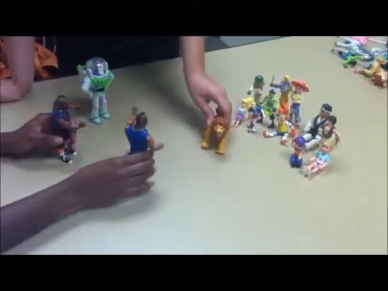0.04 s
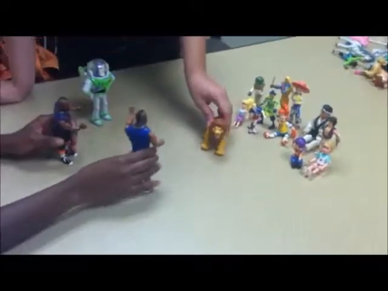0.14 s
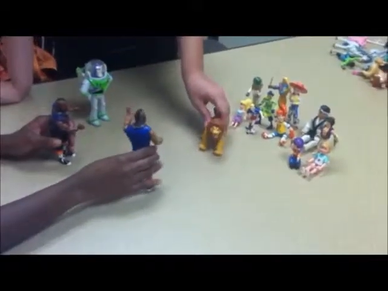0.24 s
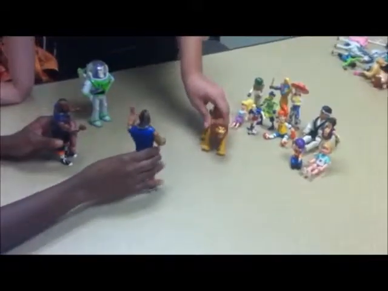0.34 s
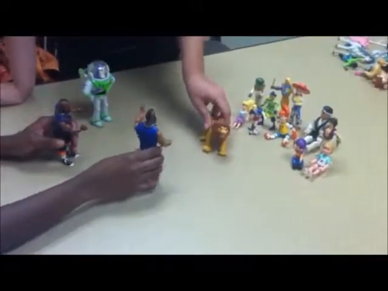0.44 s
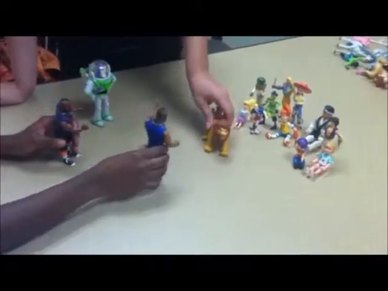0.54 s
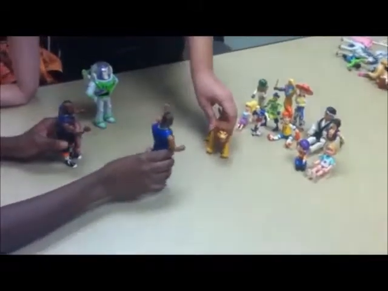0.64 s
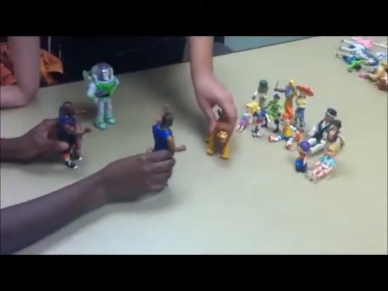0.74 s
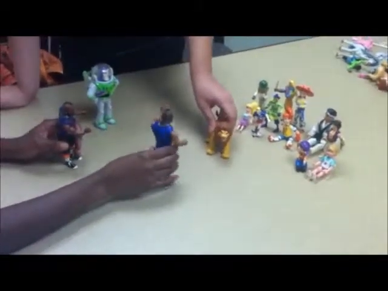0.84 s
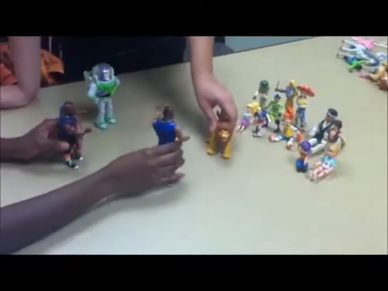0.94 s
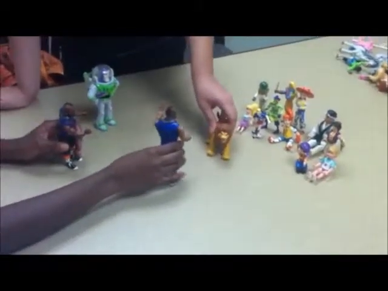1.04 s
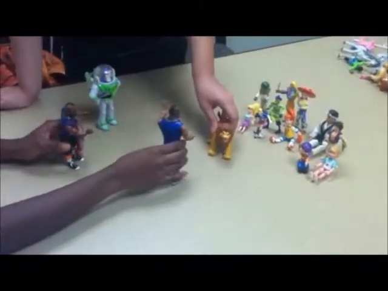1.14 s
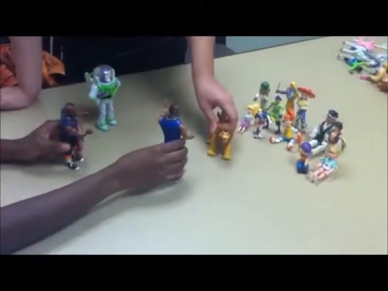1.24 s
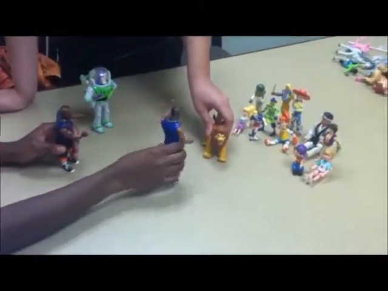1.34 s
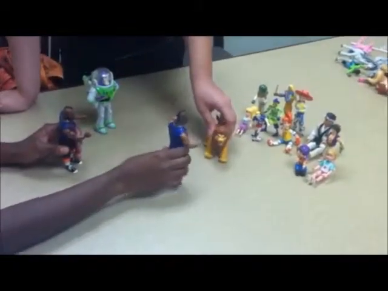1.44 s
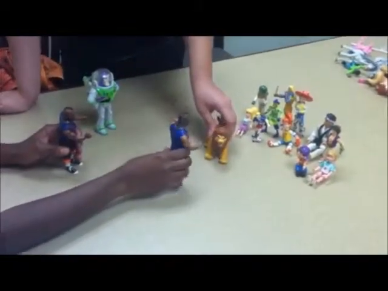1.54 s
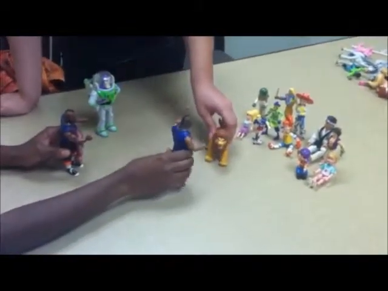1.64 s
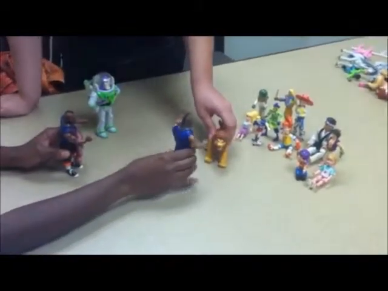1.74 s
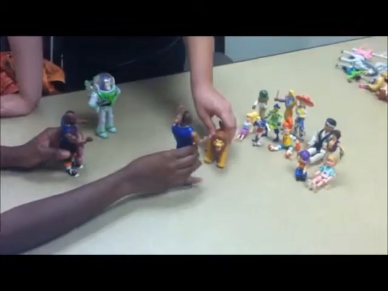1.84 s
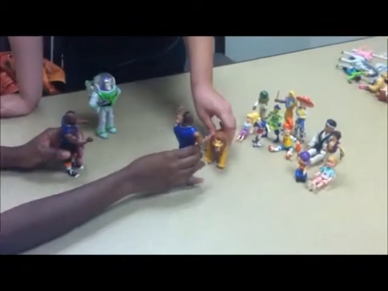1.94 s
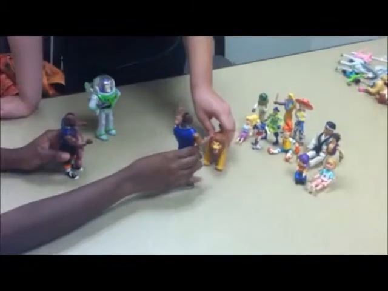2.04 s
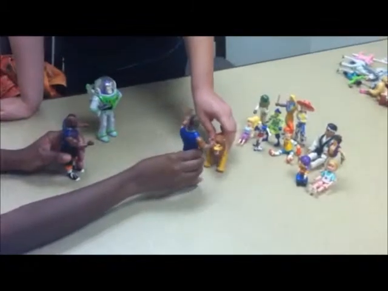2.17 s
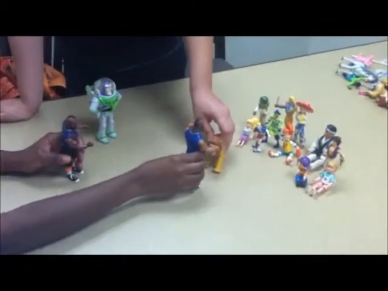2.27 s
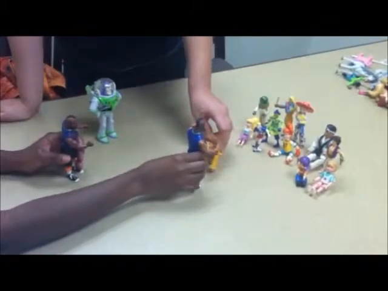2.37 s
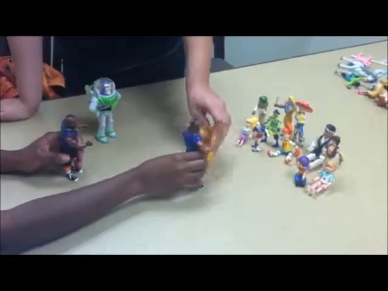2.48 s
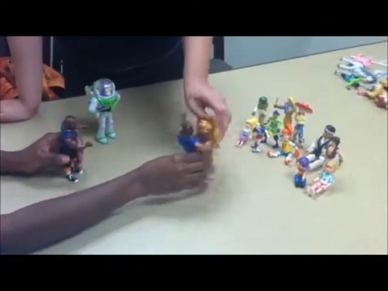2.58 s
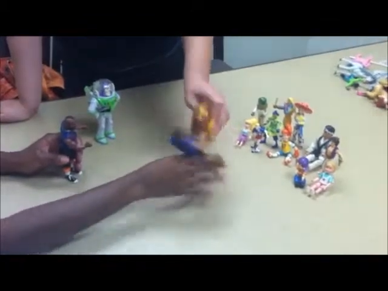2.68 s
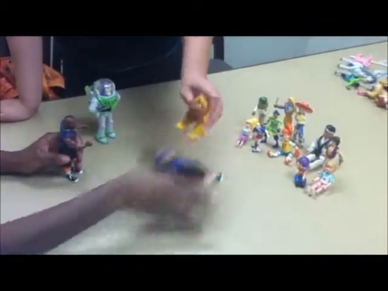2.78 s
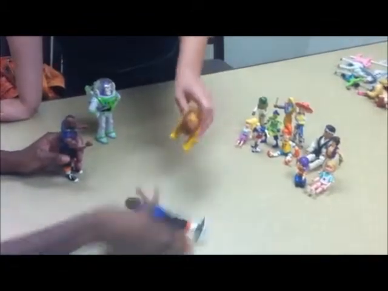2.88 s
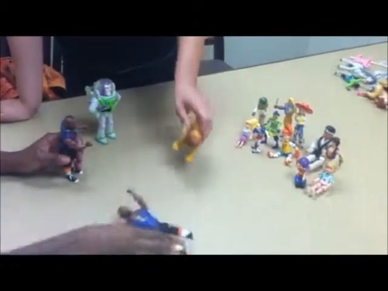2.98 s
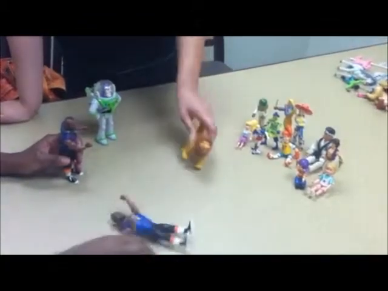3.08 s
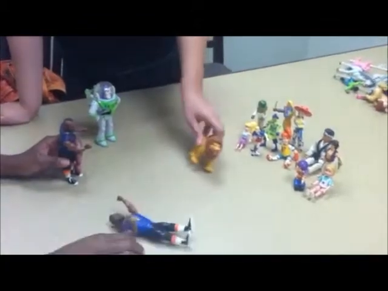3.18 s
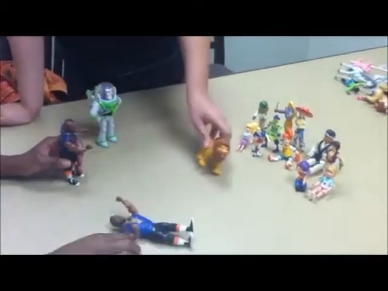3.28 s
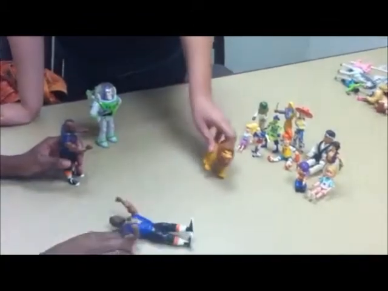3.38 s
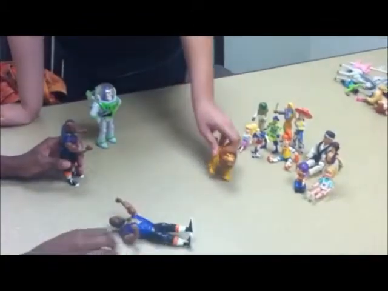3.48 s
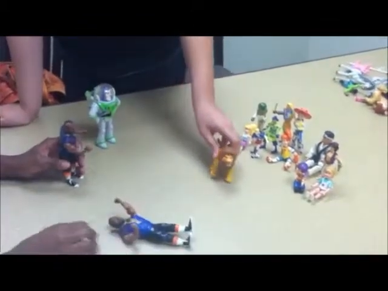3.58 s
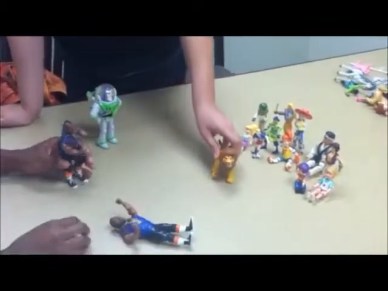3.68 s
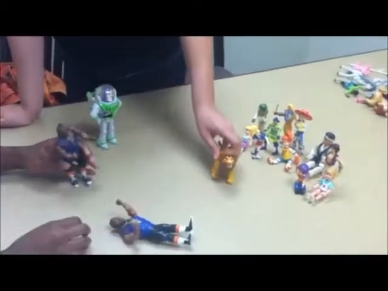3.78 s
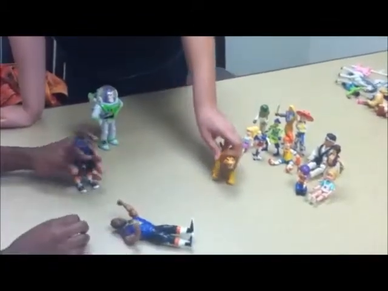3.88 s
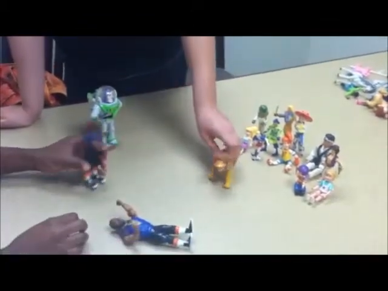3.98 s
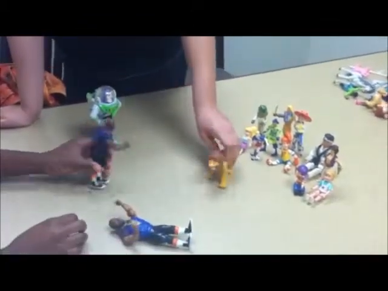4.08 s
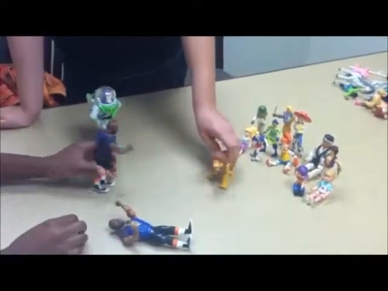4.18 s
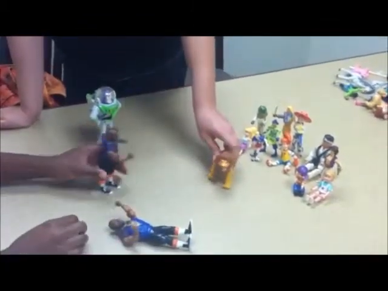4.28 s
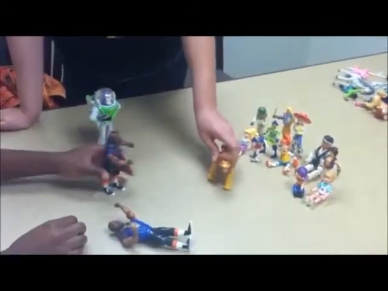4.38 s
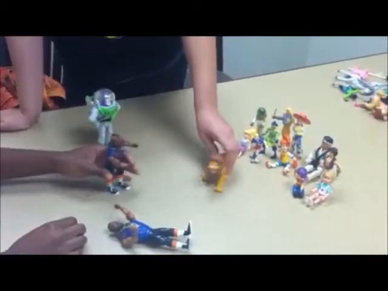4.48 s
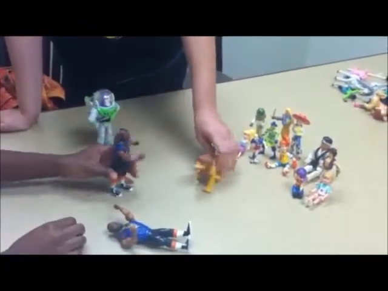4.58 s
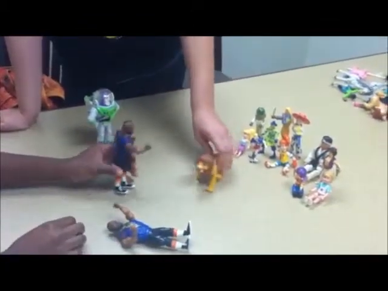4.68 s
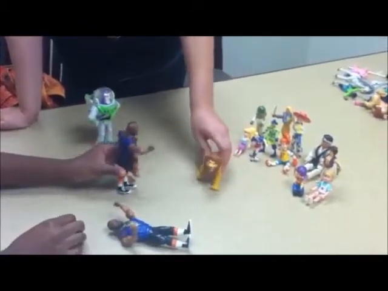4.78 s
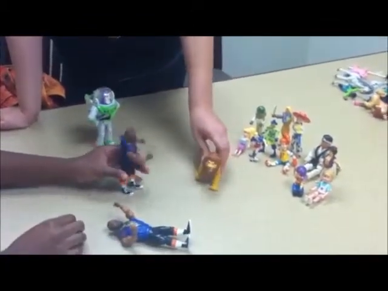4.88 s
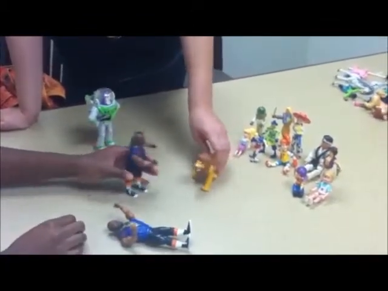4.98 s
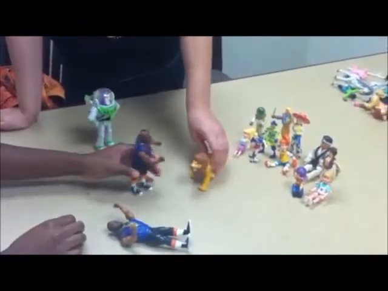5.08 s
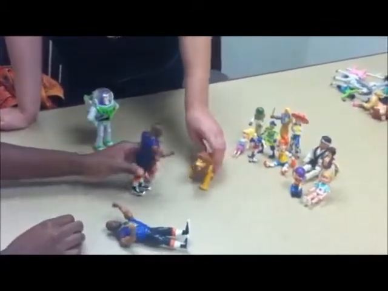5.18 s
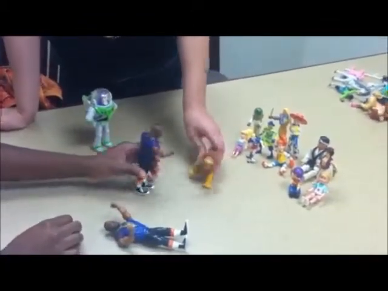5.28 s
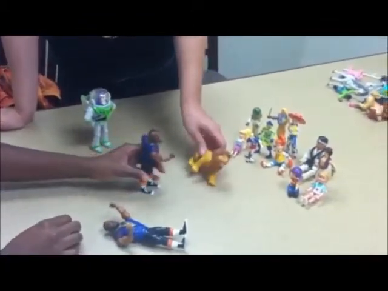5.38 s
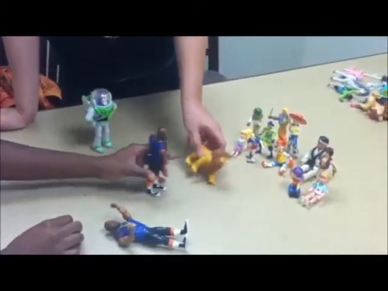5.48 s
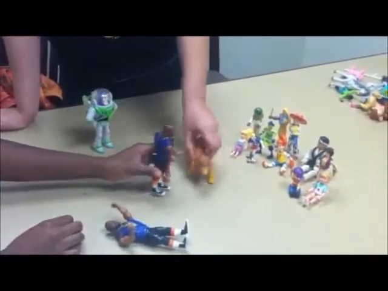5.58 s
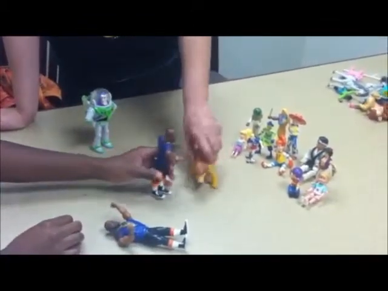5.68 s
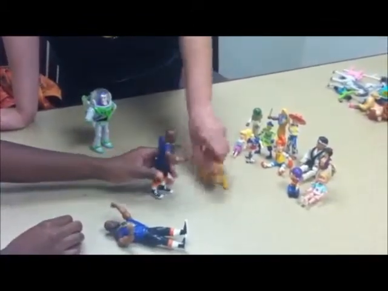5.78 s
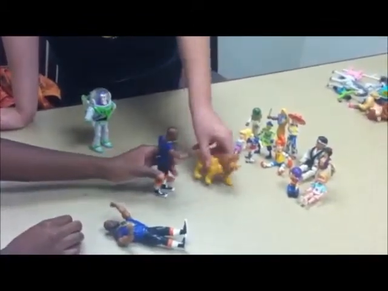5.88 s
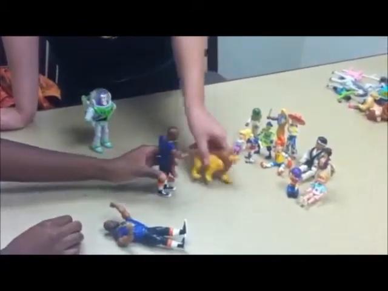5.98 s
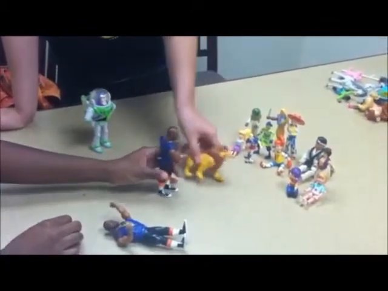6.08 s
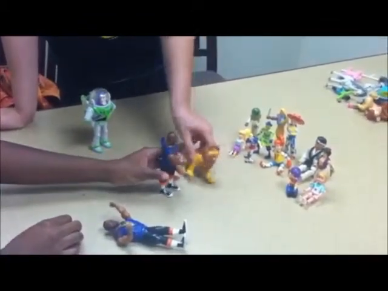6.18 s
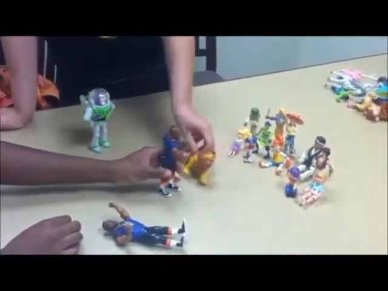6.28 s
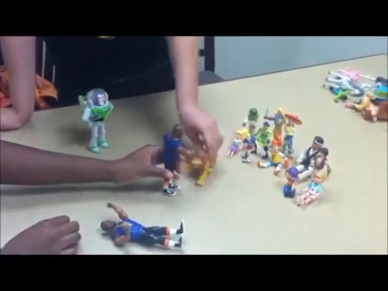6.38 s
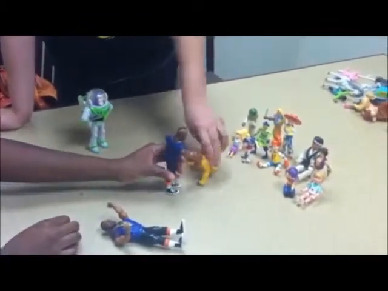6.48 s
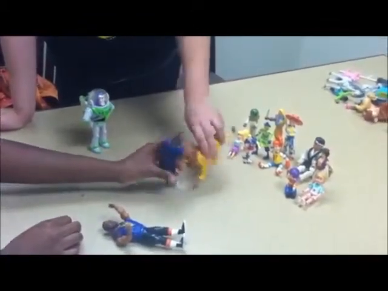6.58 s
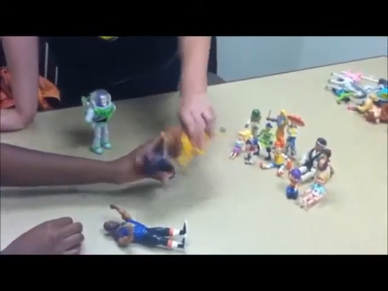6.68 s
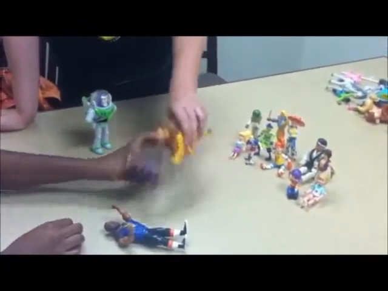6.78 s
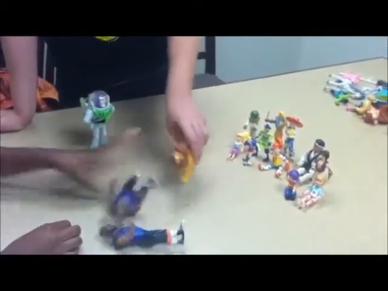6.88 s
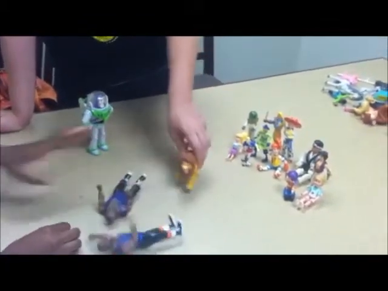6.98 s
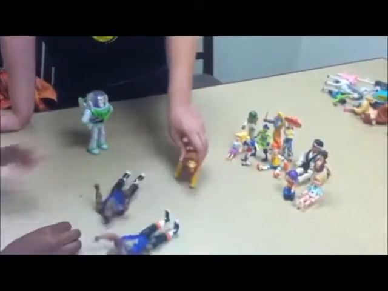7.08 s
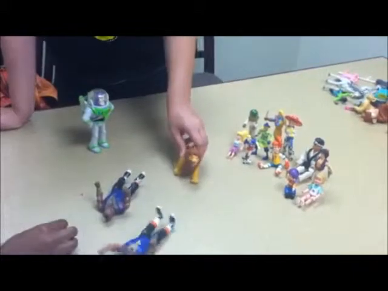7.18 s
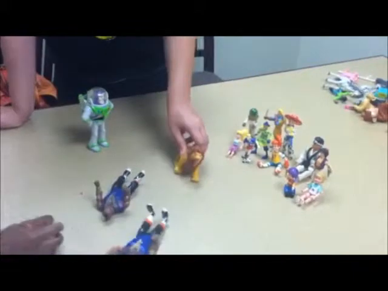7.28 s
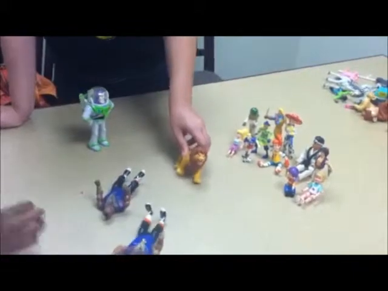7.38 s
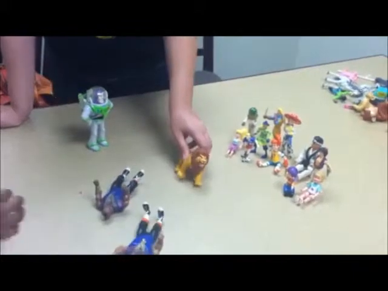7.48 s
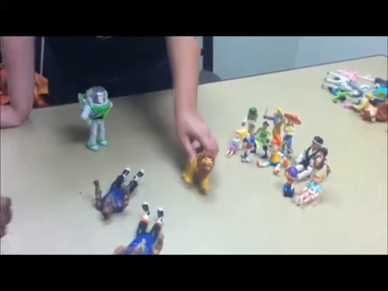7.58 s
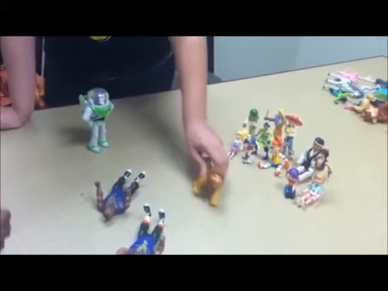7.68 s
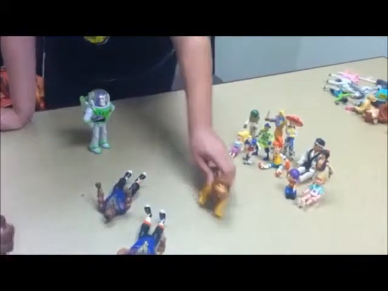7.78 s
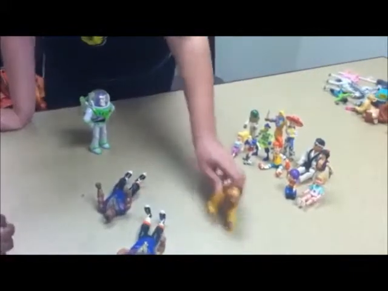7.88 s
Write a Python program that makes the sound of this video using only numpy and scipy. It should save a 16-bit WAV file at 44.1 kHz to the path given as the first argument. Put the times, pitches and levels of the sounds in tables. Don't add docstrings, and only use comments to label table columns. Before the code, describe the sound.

Faint toy footsteps on a wooden table, a hard plastic knock and clatter, more scuffing taps, then a second rattling fall and a final knock.

```python
import sys
import numpy as np
from scipy import signal
from scipy.io import wavfile

SR = 44100
rng = np.random.default_rng(int(sys.argv[2]) if len(sys.argv) > 2 else 0)


def field_ratio(decibels):
    return 10 ** (np.asarray(decibels, dtype=float) / 20)


def to_wav(sig):
    pcm = np.clip(np.atleast_2d(sig), -1, 1) * 32767
    pcm = np.round(pcm).astype(np.int16)
    wavfile.write(sys.argv[1], SR, pcm.T)


N = 349713

# f/Hz, density/dB per Hz
HUSH_SPECTRUM = [(15, -30), (25, -5), (36, -4.5), (54, -19), (241, 0.5), (811, -21.5), (901, -9),
                 (1240, -13), (2150, -15), (4150, -16), (5130, -16.5), (7820, -19.5), (12600, -29),
                 (13600, -21)]
# t/s, rms level/dB
WHINE_LEVEL = [(0, -89), (.6, -100), (1.3, -91), (1.5, -86), (3.3, -89.5), (3.8, -103), (6.6, -99),
               (7.0, -86), (7.93, -85.5)]
# f/Hz, level re direct/dB, t60/s
ROOM_TAIL = [(99, -15, 0.33), (243, 0.5, 0.5), (497, -6.5, 0.51), (1053, 0, 0.47), (1700, -3.5, 0.45),
             (2600, -6, 0.45), (4150, -9, 0.56), (6700, -8, 0.23), (12050, -7.5, 0.61)]
# t/s, length/s, rumble level/dB, rasp re rumble/dB, grit re rasp/dB
SCUFFS = [(-0.02, 0.14, -61.5, -7.5, -1), (0.32, 0.33, -69.5, -9, -2), (1.11, 0.52, -67.5, -10, -6),
          (2.554, 0.15, -70, 21, 8.5), (2.764, 0.15, -73, 10, 4), (2.905, 0.025, -54, -17, -3),
          (3.29, 0.057, -77.5, 8.5, 16), (7.183, 0.19, -76, 12.5, 10.5), (3.411, 0.12, -65.5, 1.5, 2),
          (3.519, 0.63, -69.5, -1.5, 6), (3.998, 0.11, -59.5, -4.5, -1), (4.36, 0.13, -60.5, -9, 6),
          (4.486, 0.66, -60, -8.5, -3), (5.262, 0.15, -67, -6.5, -2), (5.389, 0.034, -66.5, 14.5, -8),
          (5.406, 0.047, -66.5, 14.5, -1.5), (5.491, 0.12, -62, -1.5, -1), (5.724, 0.43, -64, 0.5, -0.5),
          (6.127, 0.15, -60, -6, -5.5), (6.267, .09, -72, 10, -3), (6.395, 0.16, -70, 10.5, -2),
          (6.614, 0.18, -86, 13.5, 9.5), (7.373, 0.6, -59, -7, 1.5)]
# t/s, peak level/dB, f/Hz, t60/s
TICKS = [(2.563, -23.5, 3000, 0.0014), (2.563, -18.5, 5970, 0.0022), (2.587, -46, 5350, .02),
         (2.608, -37.5, 802, 0.011), (2.608, -36, 4970, .005), (2.643, -40, 7500, .004),
         (2.651, -41, 2470, 0.0076), (2.698, -50, 7200, .004), (2.706, -46, 5500, .005),
         (2.7491, -32, 5560, 0.0058), (2.7479, -41, 2270, 0.013), (2.760, -45, 2400, .006),
         (2.861, -53, 4960, .005), (2.909, -60, 5400, 0.0077), (2.940, -55, 3520, .004),
         (2.962, -69, 4500, .004), (2.987, -26, 1400, 0.0031), (3.130, -48, 9400, .004),
         (3.228, -52, 7000, 0.0045), (3.308, -56, 7500, 0.0038), (3.332, -54, 9450, .004),
         (3.346, -55.5, 6500, .004), (5.340, -57.5, 5470, 0.0054), (5.411, -54, 4000, .004),
         (5.421, -49, 7960, 0.0055), (5.421, -47, 1890, .01), (5.462, -57, 1800, 0.029),
         (6.255, -45.5, 1575, 0.021), (6.262, -43.5, 2170, .015), (6.266, -57, 2780, 0.013),
         (6.678, -49, 7500, .005), (6.740, -30.5, 5500, .005), (6.786, -34, 5250, .005),
         (6.921, -30, 3080, 0.0029), (6.963, -38, 1500, 0.0058), (6.993, -29, 1190, 0.0046),
         (6.9985, -22, 1800, .0015), (7.004, -37, 2400, .006), (7.025, -36, 5800, .005),
         (7.032, -29, 5460, 0.0057), (7.147, -44, 4100, .005), (7.1727, -15.5, 2600, 0.00048),
         (7.176, -41, 2700, .008), (7.274, -41, 6000, .004), (7.300, -56, 8000, .004),
         (7.314, -55, 6970, .004), (7.321, -49, 5530, .004), (7.340, -48, 6500, .004),
         (7.7836, -16, 1500, 0.0012)]
# t/s, peak level/dB, f/Hz, t60/s
TOCKS = [(4.193, -46, 435, 0.044), (3, -55, 435, 0.04), (3.3, -47, 454, 0.087), (5.2, -49, 454, 0.099),
         (7.56, -58, 466, 0.2), (6.925, -34, 600, 0.034), (7.176, -27, 3200, 0.0069),
         (1.572, -55, 2120, 0.0091), (4.503, -55, 2400, .03), (2.985, -23, 260, 0.067),
         (2.9853, -15, 410, .012), (3.015, -35, 600, 0.018), (3.027, -34, 1150, 0.019),
         (0.41, -54, 1400, .02), (1.571, -53, 1330, 0.023), (6.999, -27.5, 590, 0.077),
         (7.024, -36, 760, 0.023), (7.19, -32, 1760, 0.011), (7.205, -32, 960, .015),
         (7.787, -29, 1116, 0.029), (7.785, -27, 1480, .02), (7.765, -39, 300, 0.046),
         (6.245, -47, 460, 0.14), (3.77, -56, 650, .06), (4.499, -55, 640, .05), (4.843, -59, 680, .05),
         (2.9995, -20, 1380, 0.028), (3.054, -29.5, 1600, 0.0084), (3.353, -52, 1770, 0.015),
         (3.849, -74, 1444, 0.016), (4.192, -52, 240, 0.32), (4.267, -55, 258, 0.17),
         (4.339, -52.5, 230, 0.25), (4.5001, -39, 1610, 0.016), (4.4975, -45.5, 1340, 0.033),
         (4.843, -47.5, 270, 0.33), (5.497, -42, 980, 0.027), (6.26, -41.5, 1055, 0.033),
         (6.739, -27.5, 2050, 0.0073), (6.7764, -38.5, 1870, 0.016), (6.7955, -36, 2400, 0.017),
         (7.0746, -29, 1560, 0.007), (7.52, -53, 1700, 0.0096), (7.173, -46, 1546, 0.008),
         (7.7837, -32, 1140, 0.017), (7.785, -34, 282, 0.071)]
# f/Hz, level/dB, t60/s
TABLETOP_MODES = [(39.8, -21.5, 0.11), (131, -10.5, .2), (169.4, -14, 0.31), (221.8, -11.5, 0.16),
                  (273.8, -2.5, 0.036), (318.8, -8, 0.13), (365.6, -13.5, 0.15), (425, 5.5, 0.02),
                  (459, 2, 0.06), (539, -4.5, 0.082), (605.4, -3.5, 0.059), (708, -9.5, 0.012)]
# f/Hz, level/dB, t60/s
FIGURE_MODES = [(810, -2, 0.0033), (1050, -7, 0.01), (1143, -2, 0.031), (1300, -7.5, 0.011),
                (880, -4, 0.025), (1480, -2, 0.03), (1668, 5, 0.0066), (1800, 2.5, 0.016),
                (2018, -10, 0.024), (2160, 2, 0.0059), (2700, -2, 0.0041)]
# low f/Hz, high f/Hz
PARTS = [
    (650, 1280),
    (1400, 2705),
    (2700, 6800),
    (6400, 11700),
]
# f/Hz, width/Hz, level/dB
SHELL = [
    (5350, 100, -2),
    (7600, 1100, -3),
]
# t/s, tilt/dB per octave
SPOT_TILT = [(0, -6), (2.4, -4.5), (3.0, 2.5), (3.8, 1.5), (4.15, -7.5), (4.4, 0), (4.55, 3), (4.85, -2),
             (5.1, -4.5), (6.5, -2.5), (6.9, 16), (7.8, 1.5)]
# t/s, tabletop level/dB, plastic level/dB, part struck (0 torso - 3 edge)
FIRST_WALK = [(0.002, -59, -73, 4), (0.2018, -57, -66, 0.17), (0.3333, -49.5, -61, 0.89),
              (0.397, -53.5, -58, 0.011), (0.6083, -57.5, -65.5, 0.3), (0.7416, -52.5, -58, 1.8),
              (0.8887, -61, -65.5, 0.01), (0.9451, -64, -84, 0.85), (1.1341, -63, -67, 1.6),
              (1.179, -56, -70, 0.61), (1.4662, -66, -78, 1.1), (1.5718, -44, -53.5, 0.31),
              (1.7478, -62.5, -85, 2.5), (1.984, -47.5, -59, 0.76), (2.0167, -79, -64.5, 0.3),
              (2.3823, -49, -51.5, 2.2), (2.436, -61, -68, 0.01), (2.5366, -58, -75, 0.01)]
# t/s, tabletop level/dB, plastic level/dB, part struck
SECOND_WALK = [(3.49, -68, -68.5, 1.6), (3.5207, -49, -51.5, 3.7), (3.624, -65, -82.5, 2.1),
               (3.746, -63.5, -59, 3.3), (3.7665, -47.5, -57.5, 0.67), (3.848, -55, -50, 0.45),
               (4.018, -64, -59.5, 3.1), (4.0718, -50.5, -56, 1.4), (4.1912, -42.5, -42, 2.97),
               (4.2665, -45.5, -54.5, 3.8), (4.3372, -46.5, -56.5, 2.4), (4.3868, -61.5, -55, 0.98),
               (4.416, -57.5, -62, 2.2), (4.454, -77, -61, 3.3), (4.4999, -49.5, -52.5, 0.56),
               (4.5132, -72, -50.5, 3.3), (4.644, -61, -64, 0.01), (4.6882, -62, -57, 2.6),
               (4.767, -63.5, -84, 0.84), (4.841, -39, -45.5, 1.46), (4.937, -81.5, -62, 3.5),
               (4.9457, -67, -77, 0.3), (4.9842, -66, -48, 2.4), (5.014, -48, -54, 0.21),
               (5.0545, -50.5, -61, 0.8), (5.0817, -48.5, -53, 1.5), (5.3271, -51.5, -53, 2.14)]
# t/s, tabletop level/dB, plastic level/dB, part struck
SCUFFLE = [(5.4451, -50, -52.5, 2.2), (5.457, -48, -54, 2.3), (5.4967, -52, -45.5, 0.79),
           (5.5258, -45, -51, 3.4), (5.6744, -69, -54.5, 2.8), (5.7429, -44, -52.5, 1.7),
           (5.7928, -43.5, -46, 2.1), (5.9026, -54.5, -64, 1.8), (5.973, -63.5, -46, 3.34),
           (6.187, -59.5, -61, 0.014), (6.239, -61.5, -59.5, 0.4), (6.2614, -48.5, -45, 1.44),
           (6.4167, -52.5, -64, 0.38), (6.4333, -45, -45.5, 0.48), (6.4965, -51.5, -50.5, 0.25),
           (6.511, -45, -59, 0.12), (6.6106, -50, -47.5, 3.4), (6.6449, -63, -52, 3.9),
           (6.679, -77, -60, 3.9), (7.5204, -94, -55, 0.79), (7.667, -74.5, -57, 2.1)]
# t/s, tabletop level/dB, plastic level/dB, part struck, loss/dB per part away
FIRST_FALL = [(2.56, -80, -51, 3, 13.5), (2.5622, -56.5, -24.5, 2.4, 12), (2.5881, -77, -46.5, 1.9, 7),
              (2.604, -66.5, -35.5, 2.3, 9.5), (2.643, -63, -46, 2.5, 3.5), (2.6525, -76.5, -41, 1.8, 11),
              (2.7461, -80, -32, 2.9, 7.5), (2.75, -74.5, -61.5, 1.5, 8.5), (2.9846, -23, -19.5, 0.9, 2.5),
              (2.9995, -34.5, -13, 2.3, 6.5), (3.0156, -51.5, -30.5, 1.1, 1), (3.029, -47.5, -27, 1.6, 9),
              (3.041, -52, -28, 1.3, 9.5), (3.054, -60.5, -22.5, 1.2, 7.5),
              (3.0754, -47.5, -36.5, 0.01, 21.5), (3.151, -41, -33.5, 0.57, 12.5), (3.194, -66, -42, 3, 5),
              (3.2119, -45, -38.5, 3, 16), (3.2535, -65, -42.5, 3.03, 28), (3.269, -56.5, -46, 3.04, 19),
              (3.292, -52.5, -48.5, 3, 8), (3.354, -57.5, -45, 0.89, 8)]
# t/s, tabletop level/dB, plastic level/dB, part struck, loss/dB per part away
SECOND_FALL = [(6.7252, -85, -54, 1.7, 17), (6.7363, -87, -50, 3.1, 13), (6.739, -71, -30.5, 2.77, 6.5),
               (6.7765, -77, -35.5, 2.3, 13), (6.7836, -82, -30, 3.55, 7), (6.7954, -79, -28.5, 2.56, 9.5),
               (6.8164, -72, -26.5, 2.41, 17), (6.9215, -40, -24.5, 2.2, 6), (6.935, -56, -40, 0.61, 6),
               (6.9799, -48, -31.5, 3.6, 3.5), (6.9986, -34.5, -18.5, 0.88, 9), (7.0235, -37, -32, 3, 4),
               (7.034, -43.5, -43, 2.5, -4), (7.0748, -65.5, -31.5, 0.9, 6.5),
               (7.1009, -43, -37, 0.26, 3.5), (7.146, -46.5, -45, 2, 3), (7.1553, -46.5, -42, 2.9, 1.5),
               (7.1737, -39, -18.5, 1.42, 15), (7.1907, -71, -27.5, 0.62, 11.5),
               (7.2293, -53, -43, 2.6, 10), (7.281, -48, -44, 3.06, 5.5), (7.7614, -37.5, -33.5, 0.89, 7.5),
               (7.7838, -40.5, -26.5, 0.92, 1.5)]

THIRD_OCTAVES_HZ = 25 * 2 ** np.arange(0, 9.4, 1 / 3)
TRAVEL_S = -0.00024


def rms_one(x):
    return x / np.sqrt(np.mean(x ** 2) + 1e-30)


def at_hz(rows, hz, column=1):
    rows = np.array(rows)
    return np.interp(np.log(hz), np.log(rows[:, 0]), rows[:, column])


def lowpass(x, order, hz):
    return signal.sosfilt(signal.butter(order, hz, fs=SR, output="sos"), x)


def band(x, low_hz, high_hz):
    return signal.sosfilt(signal.butter(2, [low_hz, high_hz], "band", fs=SR, output="sos"), x)


def noise_bands(size):
    white = rng.standard_normal((2, size))
    for k, (low_hz, high_hz) in enumerate(zip(THIRD_OCTAVES_HZ, THIRD_OCTAVES_HZ[1:])):
        yield np.sqrt(low_hz * high_hz), band(white[k % 2], low_hz, high_hz)


def clicks(at, sizes):
    out = np.full(N, 1e-18)
    np.add.at(out, at, sizes)
    return out


def ring(blows, hz, t60_s):
    r = field_ratio(-60 / (t60_s * SR))
    w = 2 * np.pi * hz / SR
    return signal.lfilter([0, np.sin(w)], [1, -2 * r * np.cos(w), r * r], blows + 1e-18)


def resonance(x, hz, width_hz):
    r = np.exp(-np.pi * width_hz / SR)
    poles = [1, -2 * r * np.cos(2 * np.pi * hz / SR), r * r]
    return signal.lfilter((1 - r * r) / 2 * np.array([1, 0, -1]), poles, x)


def hush(level_db=-75.5, whine_hz=14105):
    air = sum(noise[SR:] * field_ratio(at_hz(HUSH_SPECTRUM, hz)) for hz, noise in noise_bands(N + SR))
    air = lowpass(air, 3, 12500)
    t = np.arange(N) / SR
    whine_rms = field_ratio(np.interp(t, *np.transpose(WHINE_LEVEL)))
    whine = np.sqrt(2) * whine_rms * np.sin(2 * np.pi * whine_hz * t)
    return field_ratio(level_db) * rms_one(air) + whine


def room(x, first_s=0.00017, early_db=5.5, early_t60_s=0.069, place_s=0.21):
    t, out = np.arange(SR) / SR, 0
    early = field_ratio(early_db - 60 * t / early_t60_s)
    for place in range(3):
        tail = 0
        for hz, noise in noise_bands(SR):
            late = field_ratio(-60 * t / at_hz(ROOM_TAIL, hz, column=2))
            tail = tail + noise * field_ratio(at_hz(ROOM_TAIL, hz)) * (early + late)
        tail *= field_ratio(-26.5) * (1 - np.exp(-(t / first_s) ** 2))
        share = np.sqrt(2 / 3) * np.cos(np.pi / 3 * (np.arange(N) / SR / place_s + place))
        out = out + signal.fftconvolve(x * share, tail)[:N]
    return out


def drags(rise_s=0.02, fade_db=13):
    t, levels = np.arange(N) / SR, np.zeros((3, N))
    for s, length_s, rumble_db, rasp_db, grit_db in SCUFFS:
        corners_s = [0, rise_s, max(length_s, 2 * rise_s), length_s + 3 * rise_s]
        edges = np.interp(t - s, corners_s, [0, 1, 1, 0])
        shape = edges * field_ratio(-fade_db * np.clip((t - s) / length_s, 0, 2))
        levels += np.outer(field_ratio(np.cumsum([rumble_db, rasp_db, grit_db])), shape)
    return levels


def scuffs(slips_per_s=2500):
    caught = rng.random(N) < slips_per_s / SR
    sizes = field_ratio(2 * np.minimum(rng.exponential(1, N), 5))
    slips = caught * sizes * rng.choice([-1, 1], N)
    rumble = sum(field_ratio(db) * ring(slips, hz, t60_s) for hz, db, t60_s in TABLETOP_MODES)
    layers = [band(rumble, 80, 350), band(slips, 470, 4000), band(slips, 2700, 11500)]
    return field_ratio(-7.0) * sum(level * rms_one(layer) for level, layer in zip(drags(), layers))


def ticks():
    return sum(ring(clicks(round(s * SR), -field_ratio(db)), hz, t60_s) for s, db, hz, t60_s in TICKS)


def tocks():
    return sum(ring(clicks(round((s + TRAVEL_S) * SR), field_ratio(db)), hz, t60_s) for s, db, hz, t60_s in TOCKS)


def contact_rows(step_loss_db=5):
    walks = [np.c_[w, np.full(len(w), step_loss_db)] for w in (FIRST_WALK, SECOND_WALK, SCUFFLE)]
    groups = walks + [np.array(FIRST_FALL), np.array(SECOND_FALL)]
    s, table_db, plastic_db, part, loss_db = np.vstack(groups).T
    spot_db = np.interp(s, *np.transpose(SPOT_TILT))
    parts_db = [plastic_db - loss_db * abs(k - part) for k in range(len(PARTS))]
    return s, table_db, spot_db, parts_db


def struck(modes, at, levels_db, spread_db, flip):
    chance = rng.standard_normal((len(at), len(modes)))
    out = 0
    for k, (hz, mode_db, t60_s) in enumerate(modes):
        sizes = flip ** k * field_ratio(levels_db[:, k] + mode_db + spread_db * chance[:, k])
        out = out + ring(clicks(at, sizes), hz, t60_s)
    return out


def thuds(at, table_db, spot_db, heavy_db=-22, leg_share=0.58):
    modes_hz = np.array(TABLETOP_MODES)[:, 0]
    tilt_db = np.outer(spot_db, np.log2(np.maximum(modes_hz, 200.0) / 350))
    tilt_db[:, 0] = 24.5 + leg_share * (table_db - heavy_db)
    wood = struck(TABLETOP_MODES, at, table_db[:, None] - 7 + tilt_db, spread_db=4.0, flip=0.99)
    return lowpass(-band(wood, 85.0, 7200), 2, 900)


def knocks(at, parts_db):
    in_limb = np.array(FIGURE_MODES)[:, 0] > PARTS[0][1]
    levels_db = np.where(in_limb, parts_db[1][:, None], parts_db[0][:, None]) - 5.5
    return band(struck(FIGURE_MODES, at, levels_db, spread_db=3.5, flip=-1.059), 350, 2900)


def chatter(at, sizes, t60_s):
    step = np.arange(1, 400)
    rattle = rng.standard_normal((len(at), len(step))) * field_ratio(-60 * step / SR / t60_s)
    return clicks(at[:, None] + step, sizes[:, None] * rattle)


def contacts(snap_db=(30, 24, 19, 15), rattle_db=(-22, -17, -14, -13)):
    s, table_db, spot_db, parts_db = contact_rows()
    at = np.round((s + TRAVEL_S) * SR).astype(int)
    blows, close = thuds(at, table_db, spot_db), 0
    for k, (low_hz, high_hz) in enumerate(PARTS):
        sizes = (-1) ** k * field_ratio(parts_db[k] + snap_db[k])
        blows = blows + band(clicks(at, sizes), low_hz, high_hz)
        close = close + band(chatter(at, sizes * field_ratio(rattle_db[k]), t60_s=0.018), low_hz, high_hz)
    blows = blows + sum(field_ratio(db) * resonance(blows, hz, width_hz) for hz, width_hz, db in SHELL)
    rings = knocks(at, parts_db)
    return blows + field_ratio(-9.0) * rings, close + rings


def scene():
    blows, close = contacts()
    far = blows + scuffs()
    notes = tocks() + ticks()
    tail = room(far + field_ratio(-4.0) * notes)
    toys = lowpass(far + close + notes + tail, 2, 5780)
    return (toys + hush())[None]


def top_cut(x):
    return signal.sosfilt(signal.butter(12, 15680, fs=SR, output="sos"), x)


def record(dry):
    cut = signal.sosfilt(signal.butter(4, 114, "high", fs=SR, output="sos"), dry)
    shelved = cut + field_ratio(-13.5) * dry
    mix = 0.73 * np.tanh(shelved / 0.79) - 0.0001
    return top_cut(mix)


dry = scene()
out = record(dry)
to_wav(out)
```